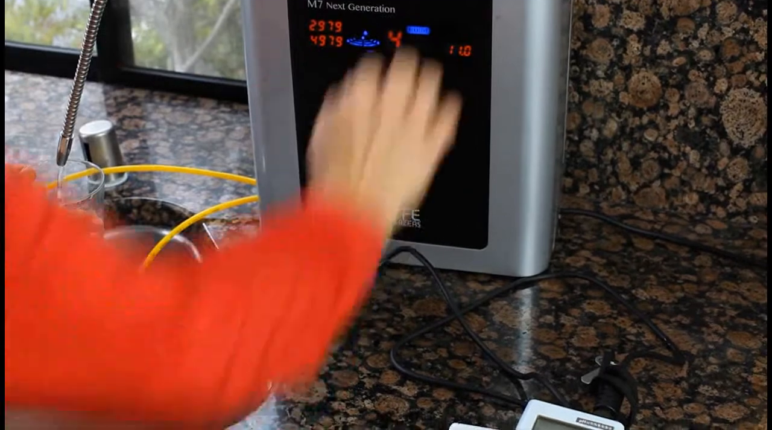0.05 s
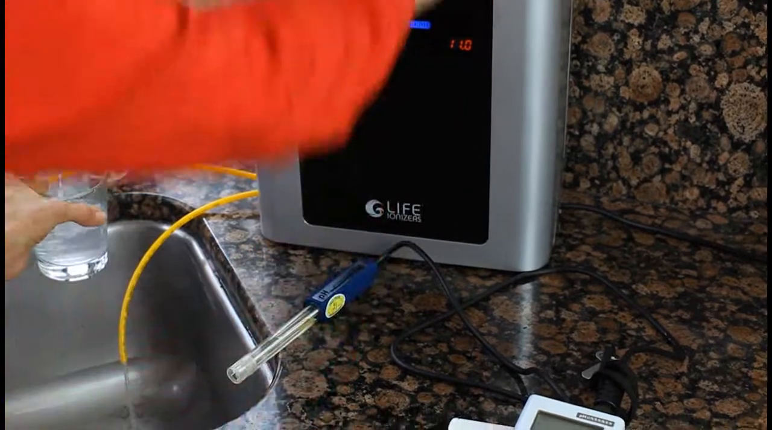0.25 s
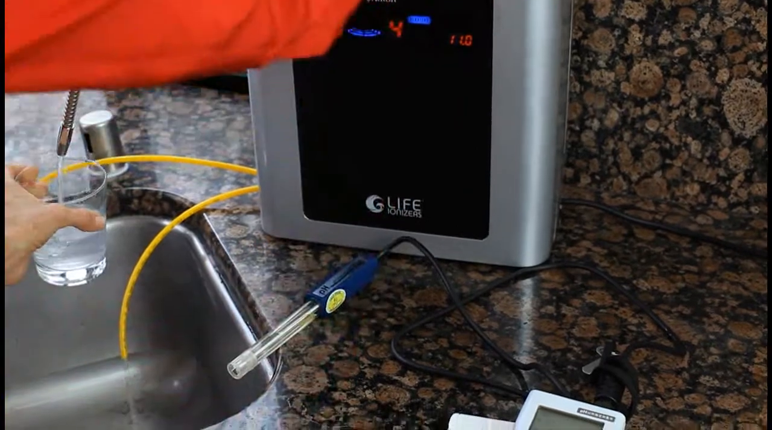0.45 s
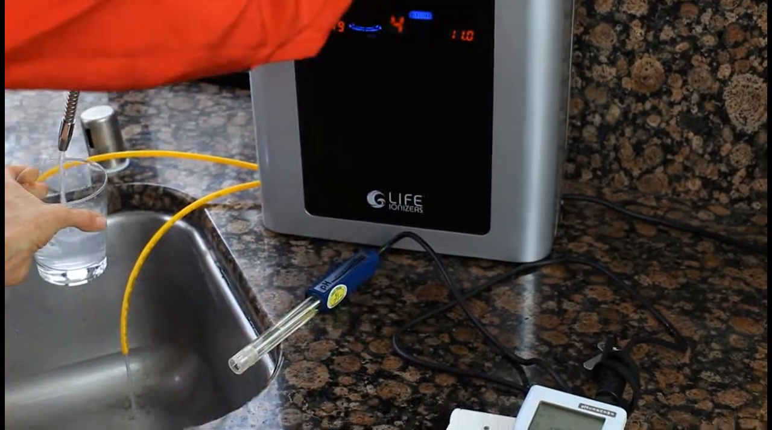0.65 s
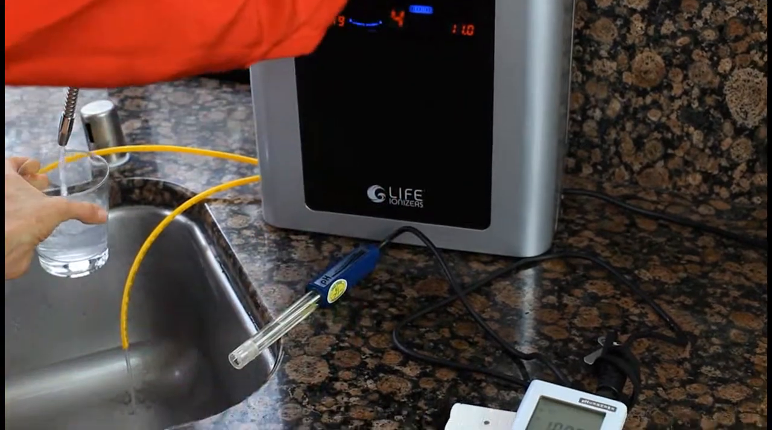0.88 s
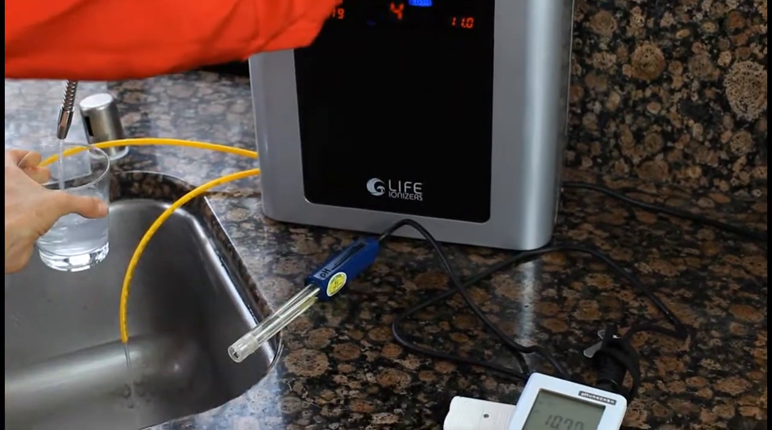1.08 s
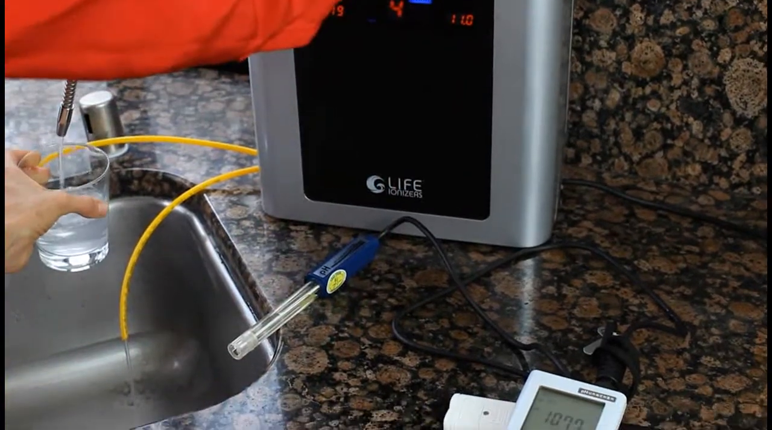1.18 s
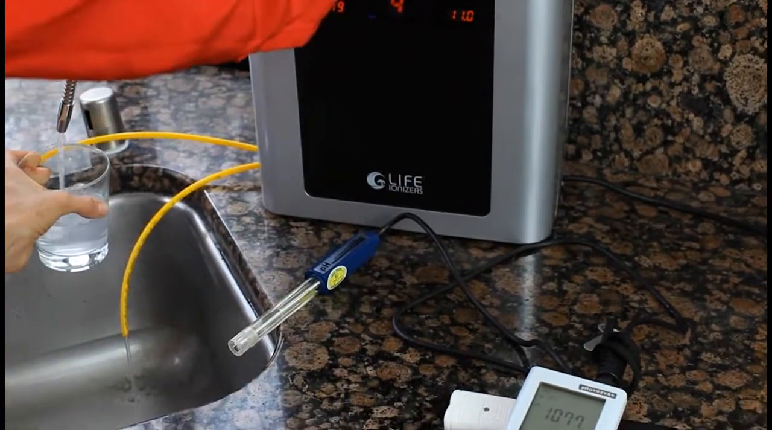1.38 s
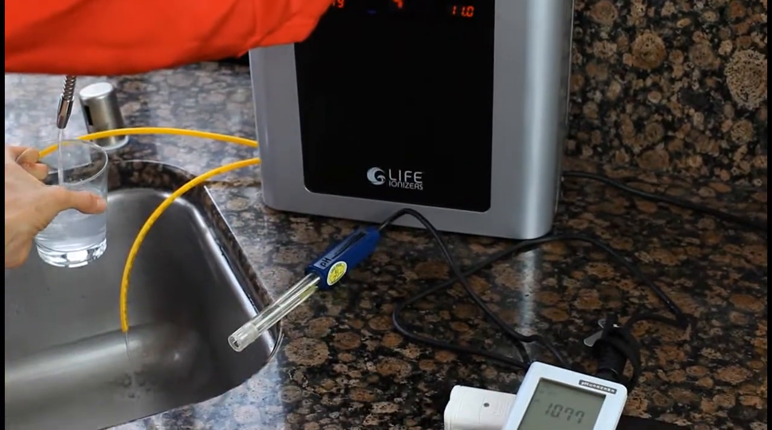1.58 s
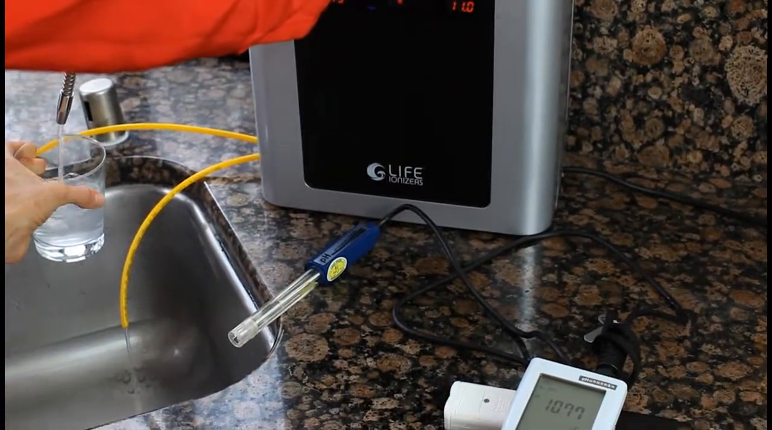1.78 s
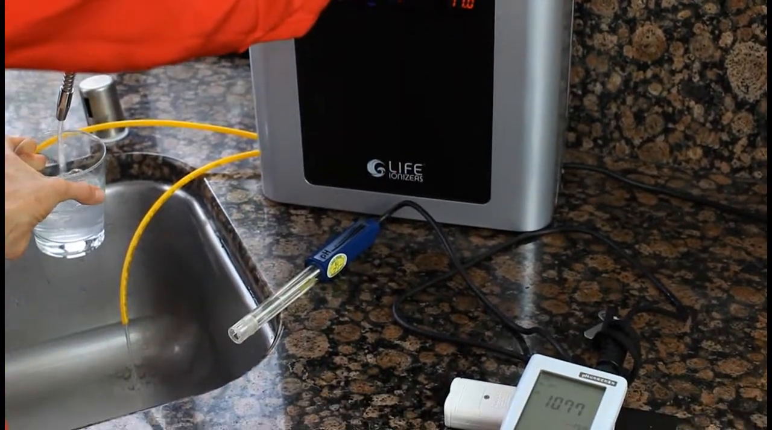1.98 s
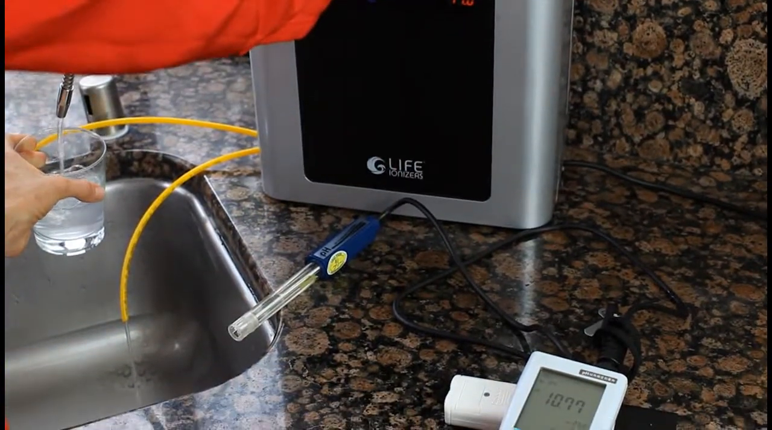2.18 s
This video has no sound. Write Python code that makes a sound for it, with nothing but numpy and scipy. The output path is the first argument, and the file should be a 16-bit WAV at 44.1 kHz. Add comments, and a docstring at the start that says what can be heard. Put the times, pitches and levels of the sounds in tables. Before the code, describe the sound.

Thin stream of water trickling irregularly into a glass over a sink, with one small thump.

```python
"""A kitchen, microphone close to a steel sink, over steady room tone. From the start a thin stream
trickles from a spout into a part-filled glass held over the sink: trapped air bubbles plop and ring,
tiny ones chirp upward, spray ticks, and the sink and the room answer. A sleeve brushes the microphone
and bumps it at 0.24 s. The trickle thins near 0.4 s, then picks up, and from 0.6 s to the end
heavier drops now and then slap the water and throw spatter."""
import sys
import numpy as np
from scipy import signal
from scipy.fft import rfft, irfft
from scipy.io import wavfile
from scipy.ndimage import uniform_filter1d

SR = 44100
rng = np.random.default_rng(int(sys.argv[2]) if len(sys.argv) > 2 else 0)


def log_audio(samples):
    """Write samples as a 16-bit WAV file to the path given in sys.argv[1]."""
    # one column per channel
    frames = np.atleast_2d(samples).T
    # limit to full scale, then quantise
    limited = np.clip(frames, -1, 1)
    pcm = np.round(limited * 32767).astype(np.int16)
    wavfile.write(sys.argv[1], SR, pcm)


N = 99225
TIME = np.arange(N) / SR
AGE = TIME[:SR // 10]   # seconds since an event began

# Levels are relative within each table.
# Spectrum of the kitchen's steady background: f/Hz, level/dB
ROOM_TONE_SPECTRUM = [(20, -11), (60, -5), (120, -4), (165, -1), (205, -4.5), (250, 0), (420, 0.5),
                      (550, -2.5), (800, 0.5), (1500, -7.5), (2200, -13.5), (5000, -14.5), (8000, -18.5),
                      (11000, -17.5), (15000, -26.5)]
# Echoes off the sink wall and counter: delay/ms, level/dB
NEAR_ECHOES = [(5.1, -8.5), (6.9, -64), (11.7, -12.5), (14.4, -21.5)]
# Strength of the sleeve's rubbing: t/s, level/dB
RUB_ENVELOPE = [(0, -52), (.06, -46.5), (.11, -41), (.15, -37.5), (.2, -34.5), (.23, -39.5), (.27, -35),
                (.3, -64), (.36, -58), (.45, -75)]
# Spectrum of that rubbing: f/Hz, level/dB
RUB_SPECTRUM = [(25, -6), (80, -4.5), (130, -4), (200, 2), (320, -5), (600, -14.5), (1500, -25),
                (5000, -52), (15000, -52)]
# Knocks on the microphone: t/s, starting f/Hz, thud level/dB, decay/ms, click level/dB
MIC_KNOCKS = [(0.2362, 562, 6.5, 1.08, -6.5), (0.2392, 1020, -2.5, 1.02, -7.5),
              (0.24, 189.5, -9, 11.8, -34), (0.2399, 354, -16, 2.5, -35), (0.2441, 1150, 2, 0.46, -26),
              (0.2733, 326, -21.5, 2.6, -40)]
# Hollow resonances of glass and sink: f/Hz, width/Hz, level/dB
HOLLOW_MODES = [(638, 17.4, 7), (810, 12, 1), (1189, 34, -8.5), (1398, 21, 4), (1567, 38, 6), (1710, 38, 9),
                (2365, 64, 6), (2563, 154, 4.5), (2960, 37, 7)]
# Broad treble peak that brightens the spray: f/Hz, width/Hz, level/dB
TREBLE_PEAK = [(10500, 990, -4)]
# Liveliness of the stream, driving its rush and faint bubbles: t/s, level/dB
LIVELINESS = [(0, 4.5), (.25, 1.5), (.42, -17), (.62, 6), (.85, 2), (.93, -1.5), (1.15, 6.5), (1.3, -5.5),
              (1.42, 2.5), (1.8, 1), (2.25, 3.5)]
# Spray drops striking water and glass: t/s, centre f/Hz, level/dB
SPRAY_DROPS = [(.0953, 9700, -28.5), (0.222, 10500, -27), (0.4495, 10800, -25), (.463, 9000, -28.5),
               (0.5544, 10500, -25), (0.6082, 7540, -15.5), (0.667, 7300, -17.5), (0.687, 10500, -30),
               (0.7578, 9900, -35), (.8356, 10500, -27.5), (.852, 11500, -27), (0.8843, 11700, -17),
               (.9482, 6800, -24.5), (1.089, 7300, -26), (1.0939, 9900, -23), (1.1783, 11100, -31),
               (1.2536, 10000, -19.5), (1.3383, 4440, -21.5), (1.3386, 10500, -28.5), (1.3669, 4700, -21.5),
               (1.366, 11100, -28), (1.384, 10500, -25), (1.42, 4800, -29), (1.512, 9700, -21.5),
               (1.5488, 4730, -22.5), (1.5496, 10500, -25), (1.6954, 12000, -29), (1.7319, 10700, -20),
               (1.7325, 4340, -33), (1.808, 11000, -20.5), (1.873, 10500, -24), (1.9634, 11100, -31.5),
               (2.0152, 10500, -30), (2.0378, 10300, -18), (2.115, 11200, -19.5), (2.192, 12000, -36),
               (2.2249, 11000, -33), (2.232, 10500, -16.5), (2.235, 10500, -18)]
# Heavier drops slapping the surface: t/s, level/dB, decay/ms
HEAVY_DROPS = [(0.61, -36, 5), (1.3384, -20, 5.2), (1.3658, -29, 11), (1.561, -28, 2.9),
               (1.733, -29.5, 8.1), (1.809, -45, 1.8), (1.873, -30, 11), (2.0153, -29, 12),
               (2.2345, -23, 5.1)]
# Tiny bubbles that surface at once: t/s, starting f/Hz, level/dB
TINY_BUBBLES = [(0.104, 2860, -37.5), (0.299, 3280, -36.5), (0.637, 2980, -39.5), (0.704, 3240, -41.5),
                (0.819, 4260, -42.5), (.849, 2950, -38.5), (1.6405, 3840, -40.5), (1.695, 3320, -47),
                (1.8052, 5960, -45.5), (2.196, 2970, -46)]
# Air bubbles trapped by the stream: t/s, starting f/Hz, level/dB, decay/ms
TRAPPED_BUBBLES = [(0.0251, 1218, -23.5, 3.9), (.027, 797, -29, 8.2), (0.042, 1230, -25, 0.85),
                   (.0585, 5270, -31.5, 1.75), (0.0851, 1020, -27, 2.4), (.179, 1000, -27, 2),
                   (0.2737, 1030, -29.5, 2.4), (0.4824, 1038, -35.5, 5.3), (.4927, 1057, -27.5, 3.6),
                   (0.5271, 1177, -31, 5.8), (0.6078, 1290, -24.5, 0.65), (.6262, 596, -36.5, 5.5),
                   (.657, 1150, -27.5, 4.9), (.667, 1196, -27, 5.2), (0.671, 1450, -34.5, 4.2),
                   (0.682, 1041, -25, 8.4), (.688, 1108, -30, 12), (.695, 780, -36.5, 6),
                   (0.7146, 934, -32, 8.3), (.7255, 1640, -45, 3), (0.7579, 1037, -23, 4.5),
                   (.762, 810, -27, 4.1), (.764, 1375, -35, 3), (.7775, 1080, -20, 1),
                   (0.7946, 1115, -21.5, 3), (.798, 605, -34.5, 3.1), (0.8519, 1460, -31.5, 2.6),
                   (.884, 1022, -34, 5), (.908, 3760, -43, 3.2), (0.952, 754, -41, 7.8),
                   (.975, 790, -41.5, 14), (0.9843, 954, -29, 8), (1.0079, 1026, -26, 8.7),
                   (1.0107, 1750, -25.5, 1), (1.0432, 1050, -29.5, 5.3), (1.0952, 1037, -32.5, 7.9),
                   (1.0948, 1960, -34.5, 2.8), (1.1216, 1017, -22.5, 3.6), (1.1509, 1213, -20.5, 5.3),
                   (1.151, 579, -35, 9.6), (1.179, 560, -39.5, 4.9), (1.1787, 1132, -20, 5.5),
                   (1.2582, 1177, -37.5, 9.6), (1.3382, 1164, -14.5, 1.97), (1.3384, 2820, -33, 0.93),
                   (1.3656, 2784, -33, 3.7), (1.366, 1460, -30.5, 0.91), (1.366, 5200, -32.5, 2.7),
                   (1.384, 960, -18.5, 1.46), (1.39, 810, -30.5, 6.9), (1.405, 966, -34.5, 7.6),
                   (1.4405, 6930, -21.5, 0.55), (1.4891, 964, -38, 4.7), (1.5511, 1167, -33, 7.5),
                   (1.5718, 934, -37, 13), (1.6123, 1166, -18, 5.6), (1.6554, 985, -22, 0.69),
                   (1.6557, 6000, -32, 1), (1.6741, 3900, -26, 0.89), (1.7326, 2680, -26, 1.05),
                   (1.7801, 1050, -26.5, 2.4), (1.782, 643, -35, 11), (1.8073, 957, -32.5, 6),
                   (1.8254, 1060, -26.5, 2), (1.83, 790, -36.5, 5.6), (1.8466, 3920, -26.5, 1.13),
                   (1.8965, 1126, -25.5, 2.4), (1.897, 615, -32.5, 5), (1.916, 946, -26, 3.3),
                   (2.018, 650, -41, 6), (2.0785, 710, -29.5, 1.6), (2.088, 1000, -32.5, 11),
                   (2.099, 1144, -27.5, 8.7), (2.105, 1413, -33.5, 2.8), (2.2341, 1700, -23.5, 0.84)]


def from_db(db):
    """Decibels to gain."""
    return 10 ** (np.asarray(db) / 20)


def add(out, s, sound):
    """Mix a sound in at s seconds."""
    start = int(np.clip(round(s * SR), 0, N - 1))
    out[start:start + len(sound)] += sound[:N - start]


def filtered(x, hz, kind, order=2):
    """Butterworth filter."""
    edges = np.clip(hz, 10, .47 * SR)
    return signal.sosfilt(signal.butter(order, edges, kind, fs=SR, output="sos"), x)


def coloured_noise(spectrum):
    """Noise of rms 1 with the given spectrum."""
    hz, db = np.transpose(spectrum)
    bin_hz = np.maximum(np.arange(N // 2 + 1) * SR / N, 1)
    gain = from_db(np.interp(np.log(bin_hz), np.log(hz), db))
    noise = irfft(rfft(rng.standard_normal(N)) * gain, N)
    return noise / noise.std()


def glide(hz):
    """A sine that follows a pitch curve."""
    return np.sin(2 * np.pi * np.cumsum(hz) / SR)


def swell(attack_ms, decay_ms, shape):
    """A quick attack and a decay that steepens with age."""
    attack = 1 - np.exp(-1000 * AGE / attack_ms)
    return attack * np.exp(-np.minimum((1000 * AGE / decay_ms) ** shape, 40))


def room_tone():
    """The kitchen's steady background noise, strongest in the lows and mids."""
    return from_db(-48.5) * coloured_noise(ROOM_TONE_SPECTRUM)


def reflections(t60_s, gap_s):
    """Dense reflections that die away after a gap; unit energy."""
    tail = rng.standard_normal(N) * from_db(-60 * TIME / t60_s) * (TIME > gap_s)
    return tail / np.linalg.norm(tail)


def kitchen_reverb(x):
    """What comes back to the microphone: treble scattered in the sink, near echoes, the room's tail."""
    sink_scatter = filtered(reflections(t60_s=0.044, gap_s=0), 3300, "high")
    room_tail = reflections(t60_s=0.22, gap_s=0.0059)
    response = from_db(-2.5) * sink_scatter + from_db(-6) * room_tail
    for delay_ms, db in NEAR_ECHOES:
        add(response, delay_ms / 1000, from_db([db]))
    return signal.fftconvolve(x, filtered(response, 12000, "low", order=1))[:N]


def resonances(x, modes):
    """Ringing that the sound excites: one two-pole resonator per mode, in parallel."""
    out = np.zeros(N)
    for hz, width_hz, db in modes:
        radius = np.exp(-np.pi * width_hz / SR)
        feedback = [1, -2 * radius * np.cos(2 * np.pi * hz / SR), radius ** 2]
        ring = signal.lfilter([1, 0, -1], feedback, x + 1e-18)
        out += from_db(db) * (1 - radius ** 2) / 2 * ring
    return out


def sleeve():
    """Cloth right on the microphone: a low rustle, and knocks that are each a damped thud and a click."""
    sag_octaves_per_s, click_lag_s, mic_low_cut_hz = 69, 0.00045, 62
    out = from_db(np.interp(TIME, *np.transpose(RUB_ENVELOPE))) * coloured_noise(RUB_SPECTRUM)
    click = filtered((AGE == 0) + 1e-18, 2600, "low")
    for s, hz, db, decay_ms, click_db in MIC_KNOCKS:
        pitch = hz * 2 ** (-sag_octaves_per_s * AGE)   # drops as the contact relaxes
        thud = -glide(pitch) * swell(attack_ms=0.41, decay_ms=decay_ms, shape=1.6)
        add(out, s, from_db(db) * thud)
        add(out, s + click_lag_s, from_db(click_db) * click / click.max())
    return filtered(out, mic_low_cut_hz, "high")


def stream_rush():
    """The stream's soft rush, which drops away in the lulls."""
    rush = filtered(rng.standard_normal(N), (500, 3170), "band")
    level_db = -55 + 0.78 * np.interp(TIME, *np.transpose(LIVELINESS))
    return from_db(level_db) * rush / rush.std()


def bubble(hz, decay_ms):
    """Trapped air rings as a dying sine, rising in pitch as it nears the surface."""
    rise_per_s, rise_limit = 14.5, 0.45   # fractions of the starting pitch
    pitch = hz * (1 + rise_limit * np.tanh(rise_per_s * AGE / rise_limit))
    return glide(pitch) * swell(attack_ms=0.48, decay_ms=decay_ms, shape=1.44)


def faint_bubbles(per_s, base_db, spread_db, low_hz, high_hz, cycles):
    """Random bubbles that ring for a few cycles, louder when the stream is lively."""
    out, s = np.zeros(N), 0
    for wait, pitch_draw, strength in rng.random((900, 3)):
        s -= np.log(1 - wait) / per_s   # Poisson arrivals
        if s < N / SR:
            hz = low_hz * (high_hz / low_hz) ** pitch_draw
            db = base_db + np.interp(s, *np.transpose(LIVELINESS))
            db += spread_db * min(-np.log(1 - strength), 3)   # a few stand out
            add(out, s, from_db(db) * bubble(hz, decay_ms=1000 * cycles / hz))
    return out


def spray_ticks():
    """Each spray drop lands as a pinprick click and a brief fizz, in a band around its own pitch."""
    decay_s, width_octaves = 0.00065, 0.66
    out = np.zeros(N)
    fade = np.exp(-np.minimum(AGE / decay_s, 40))
    for s, hz, db in SPRAY_DROPS:
        fizz = from_db(2) * rng.standard_normal(len(AGE)) * fade / np.linalg.norm(fade)
        band_hz = hz * 2 ** (np.array([-.5, .5]) * width_octaves)
        tick = filtered((AGE == 0) + fizz, band_hz, "band")
        add(out, s, from_db(db + 3) * tick / np.linalg.norm(tick))
    return out


def spatter():
    """A heavy drop slaps the water and throws a quickly dying shower of droplets, each a broad click."""
    droplets_per_s, spread_db = 700, 7.5
    out = np.zeros(N)
    click = filtered(1.0 * (AGE[:SR // 200] == 0), (1760, 5200), "band")
    for s, db, decay_ms in HEAVY_DROPS:
        age = 0
        for wait, size, polarity in rng.random((20, 3)):
            droplet_db = db - 5 + spread_db * (2 * size - 1.5)
            gain = from_db(droplet_db) * np.exp(-1000 * age / decay_ms)
            add(out, s + age, np.sign(polarity - .5) * gain * click / click.max())
            age -= np.log(1 - wait) / droplets_per_s
    return out


def chirps():
    """Tiny surfacing bubbles swell and fade in a few milliseconds as their pitch shoots up unevenly."""
    peak_s, octaves_per_s, wobble_octaves = 0.00183, 298, 0.353
    out, t = np.zeros(N), AGE[:SR // 100]
    envelope = t / peak_s * np.exp((1 - (t / peak_s) ** 2) / 2)
    for s, hz, db in TINY_BUBBLES:
        wobble = uniform_filter1d(rng.standard_normal(len(t)), size=16)
        octaves = octaves_per_s * t + wobble_octaves * wobble / wobble.std()
        pitch = np.minimum(hz * 2 ** octaves, SR / 2)
        add(out, s, from_db(db + 4.5) * glide(pitch) * envelope)
    return out


def plops():
    """The clear bubbles in the foreground, each with a small splash as the water closes over it."""
    splash_decay_s = 0.0016
    out = np.zeros(N)
    for s, hz, db, decay_ms in TRAPPED_BUBBLES:
        hiss = filtered(rng.standard_normal(len(AGE)), (1620, 6000), "band")
        splash = from_db(-22) * hiss / hiss.std() * np.exp(-AGE / splash_decay_s)
        add(out, s, from_db(db + 2.5) * (bubble(hz, decay_ms) + splash))
    return out


def scene():
    """One microphone by the sink: the kitchen behind, the glass close up, the sleeve touching it."""
    background = room_tone() + stream_rush()
    fizz = faint_bubbles(per_s=110, base_db=-39.5, spread_db=3.5, low_hz=3160, high_hz=15300, cycles=2.14)
    crackle = faint_bubbles(per_s=48, base_db=-37, spread_db=3.5, low_hz=8440, high_hz=15200, cycles=3.9)
    burble = faint_bubbles(per_s=70, base_db=-47, spread_db=1.5, low_hz=626, high_hz=1620, cycles=1.85)
    water = plops() + chirps() + spray_ticks() + spatter() + fizz + crackle + burble
    water = water + resonances(water, HOLLOW_MODES) + resonances(water, TREBLE_PEAK)
    cloth = sleeve()
    reverb = kitchen_reverb(water + from_db(-18.5) * cloth)   # little of the sleeve reaches the room
    return (background + reverb + cloth + water)[None]


def record(dry):
    """A steep low-pass cuts the top above 15.8 kHz."""
    return signal.sosfilt(signal.ellip(10, .1, 80, 15800, fs=SR, output="sos"), dry)


dry = scene()
out = record(dry)
log_audio(out)
```